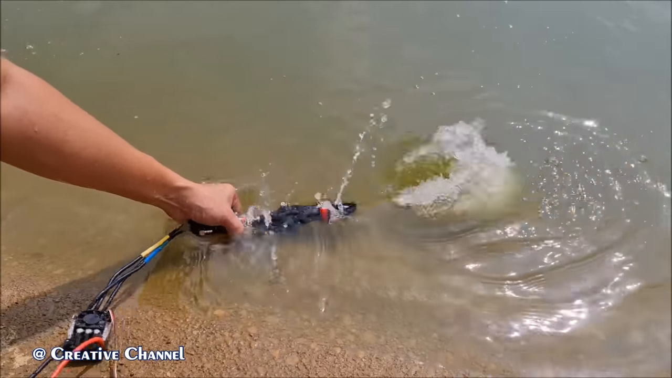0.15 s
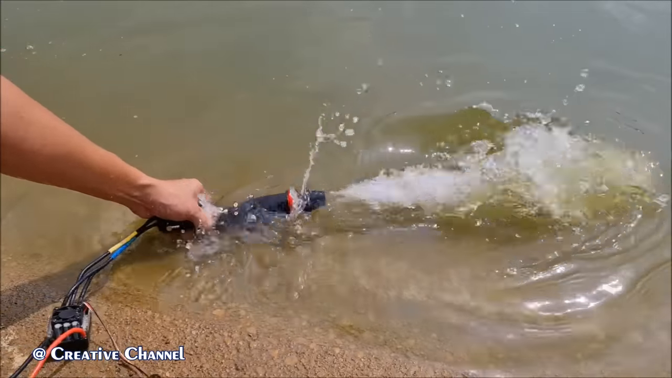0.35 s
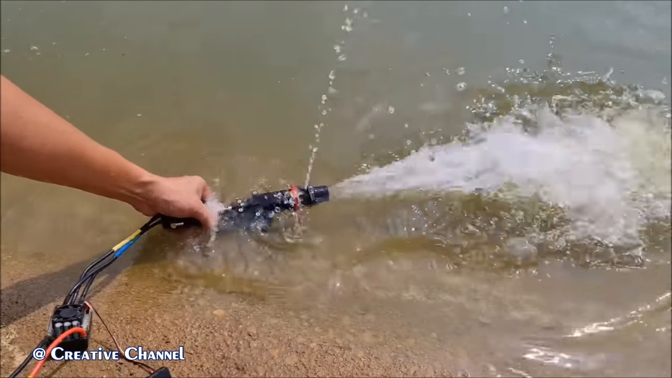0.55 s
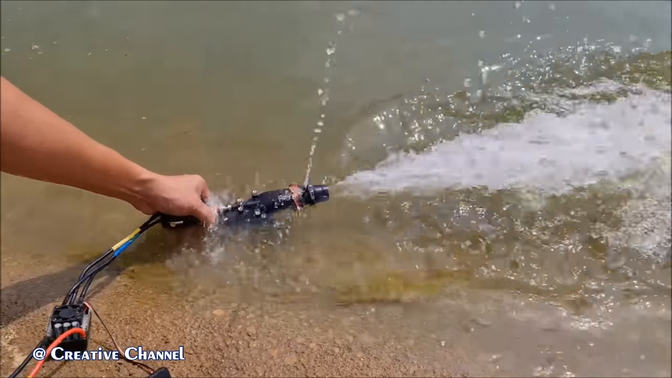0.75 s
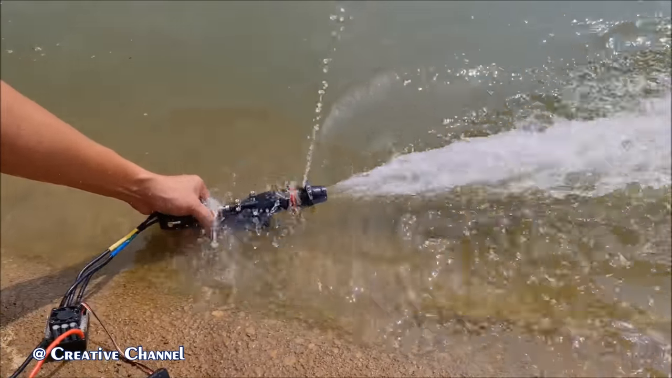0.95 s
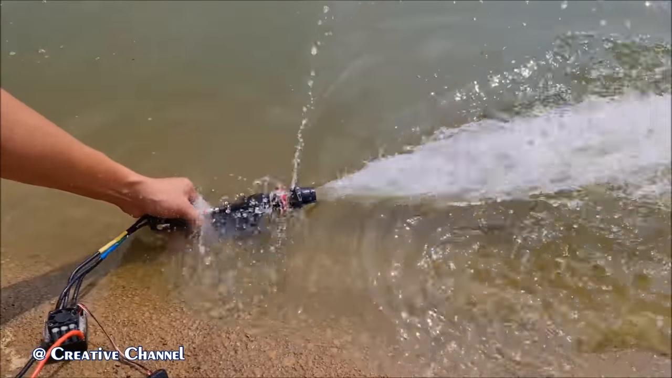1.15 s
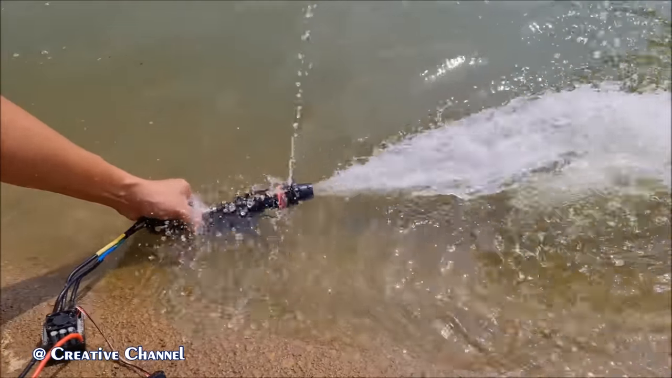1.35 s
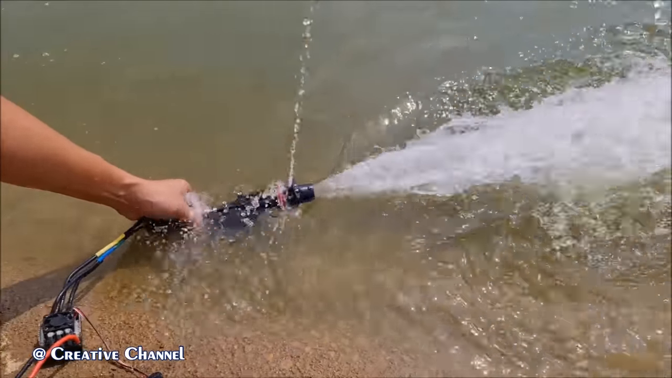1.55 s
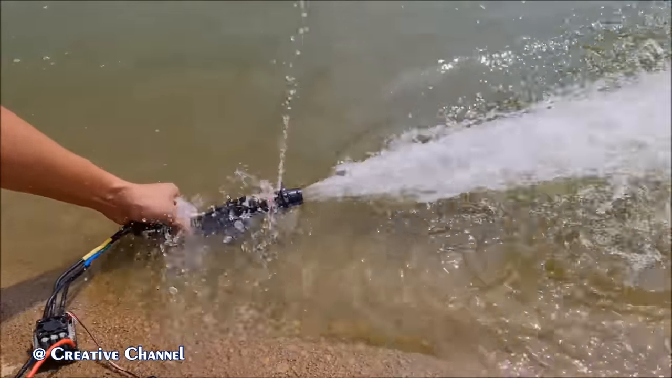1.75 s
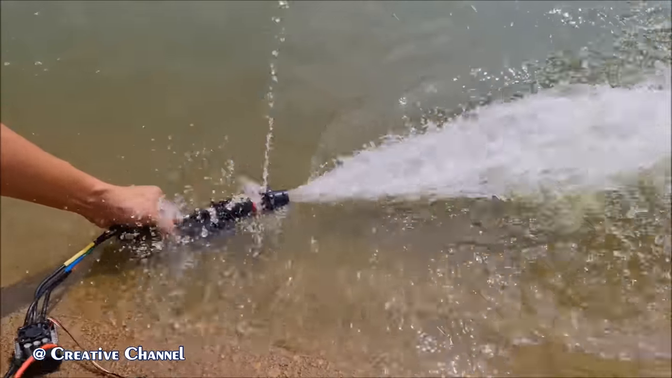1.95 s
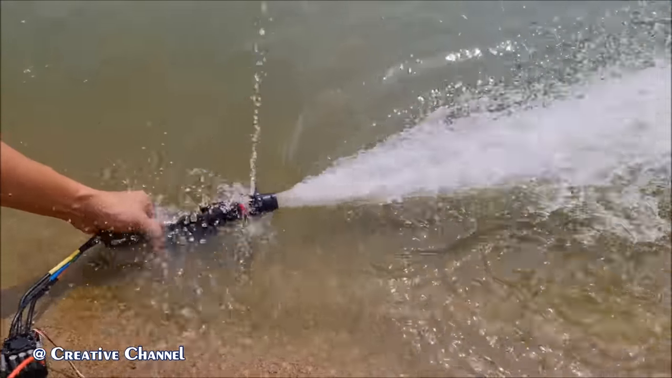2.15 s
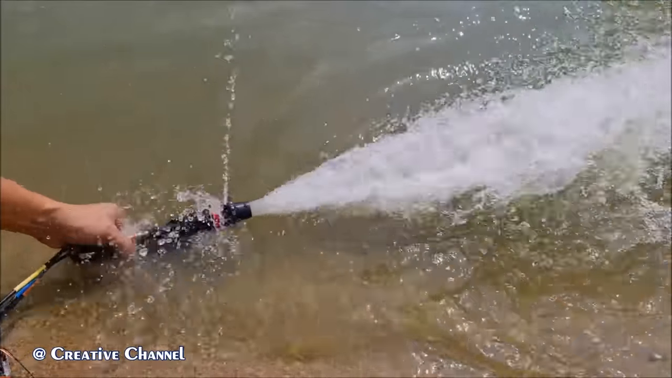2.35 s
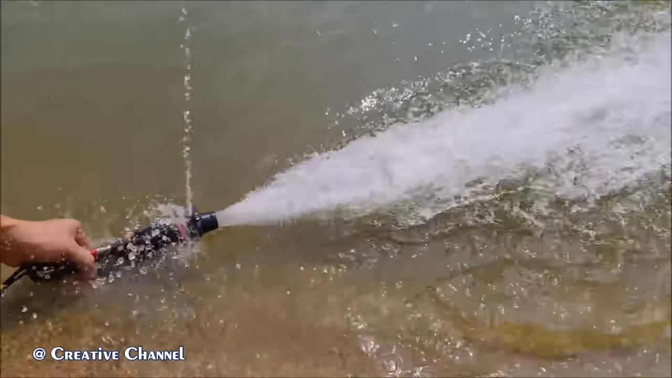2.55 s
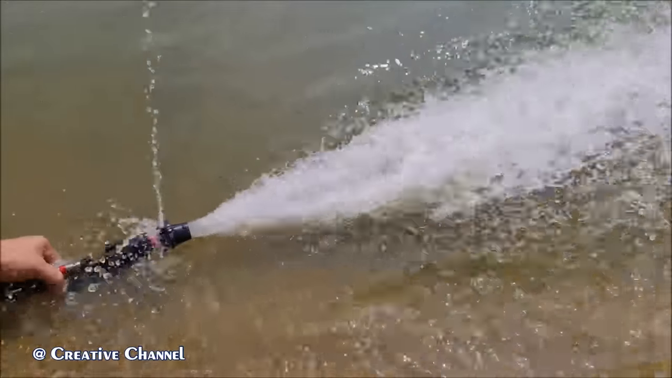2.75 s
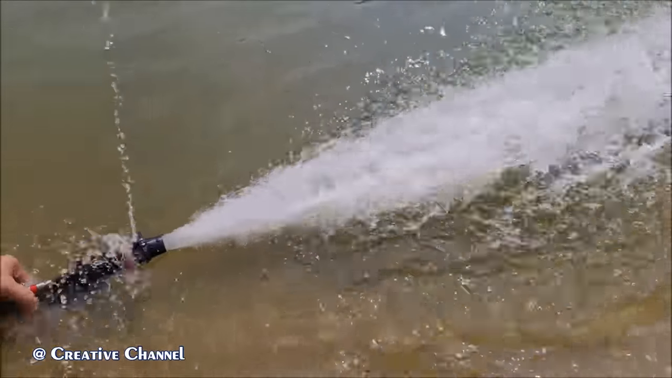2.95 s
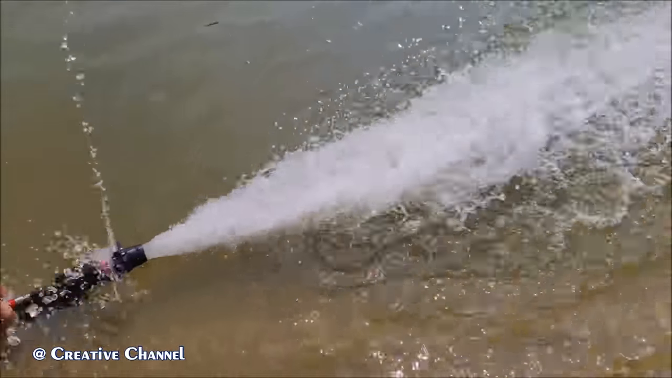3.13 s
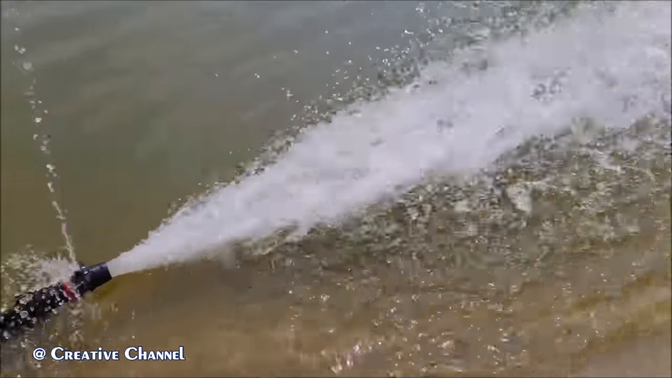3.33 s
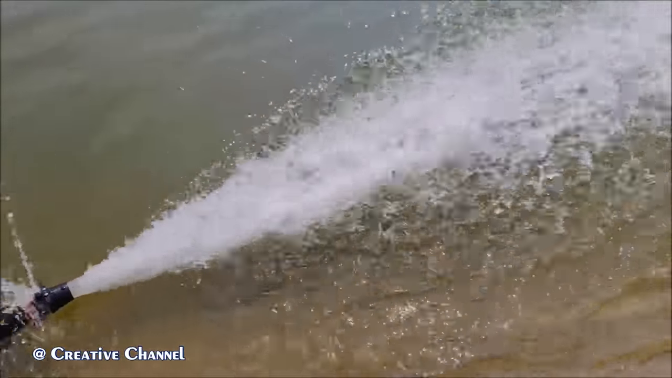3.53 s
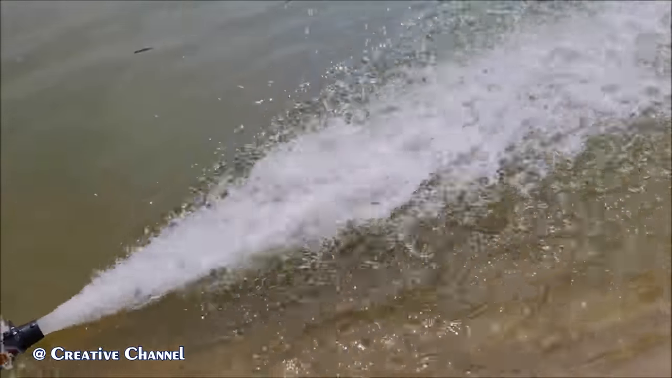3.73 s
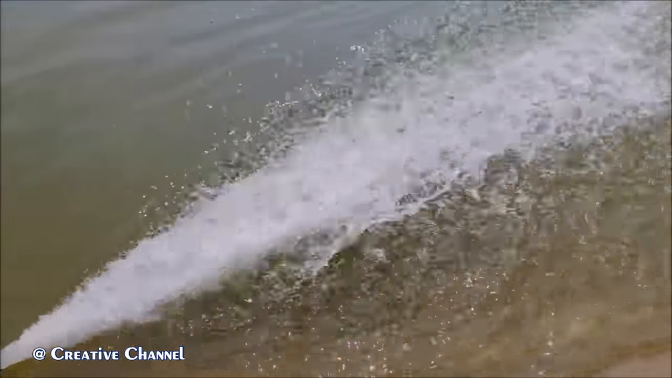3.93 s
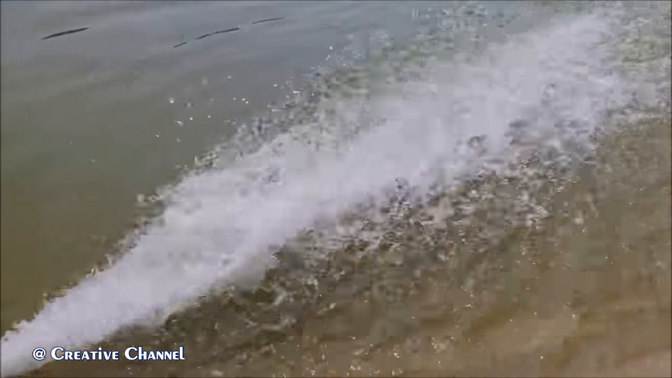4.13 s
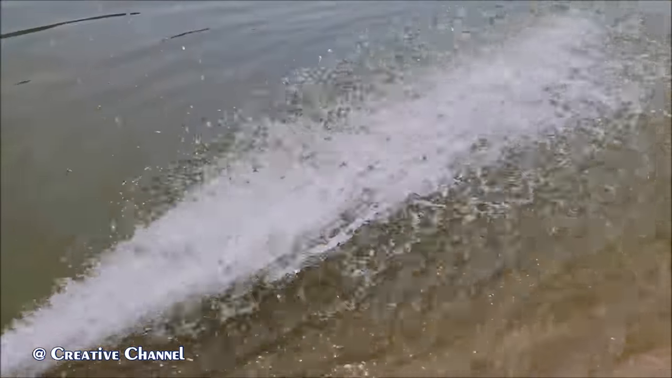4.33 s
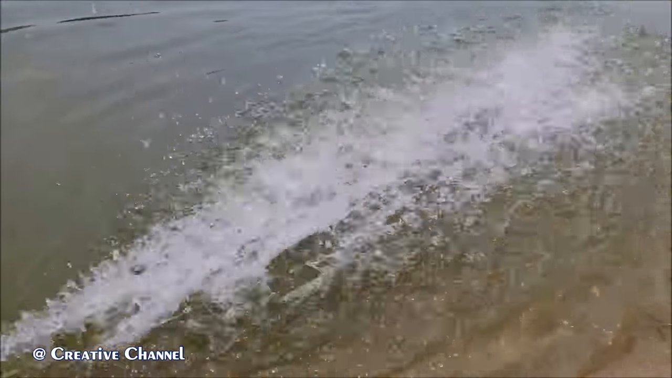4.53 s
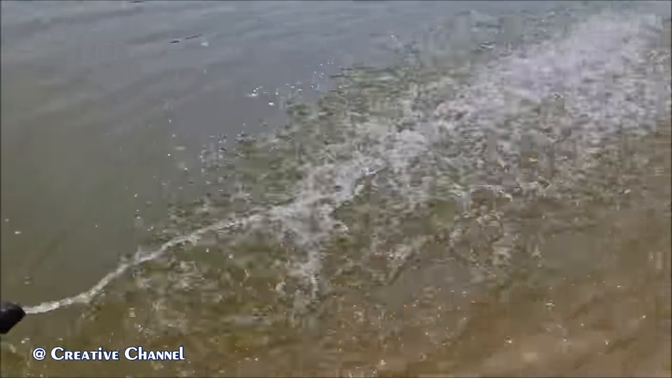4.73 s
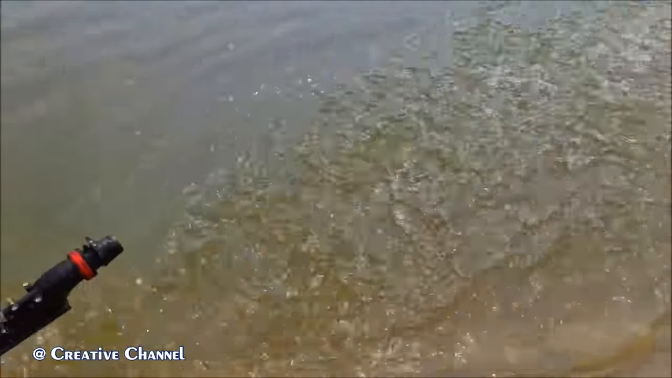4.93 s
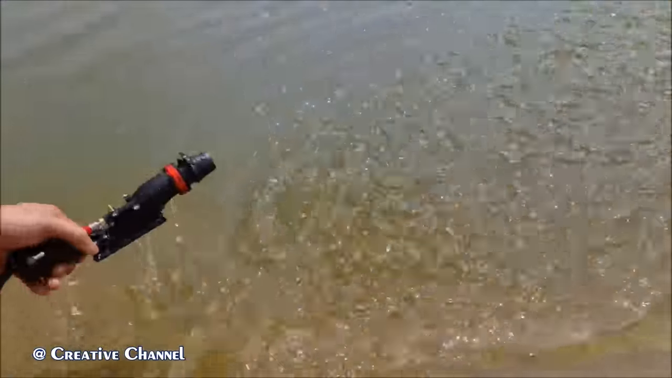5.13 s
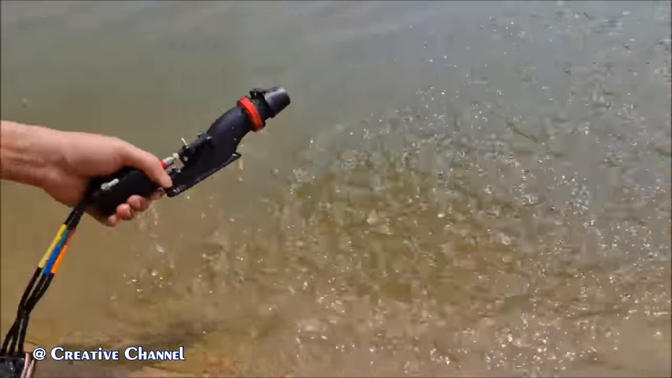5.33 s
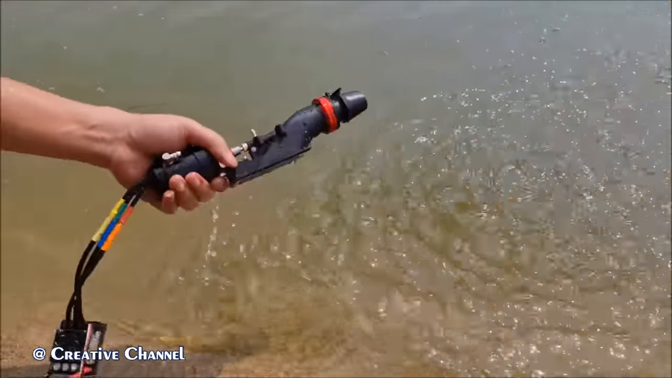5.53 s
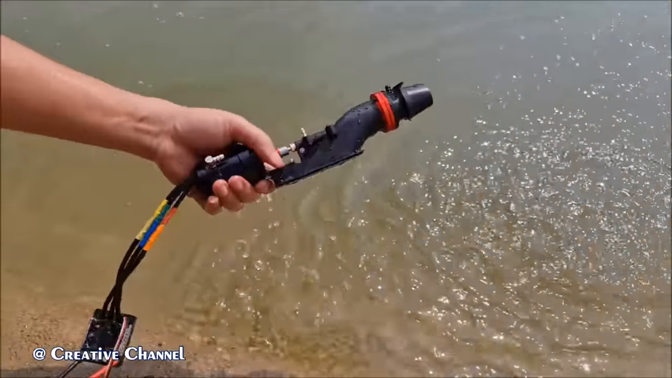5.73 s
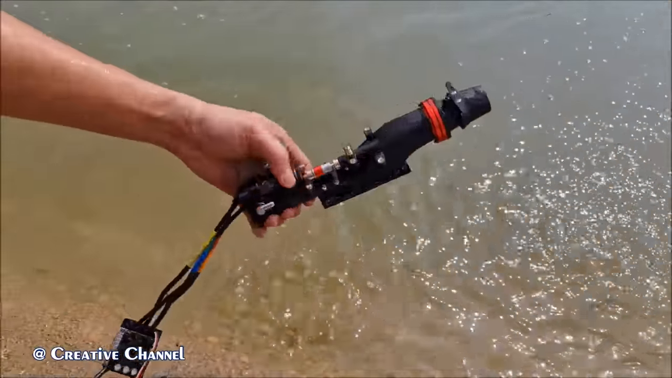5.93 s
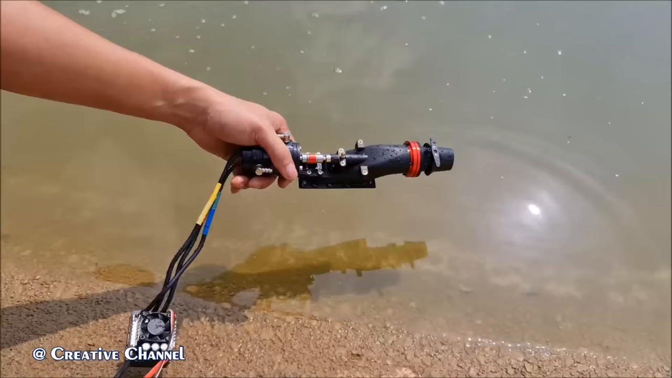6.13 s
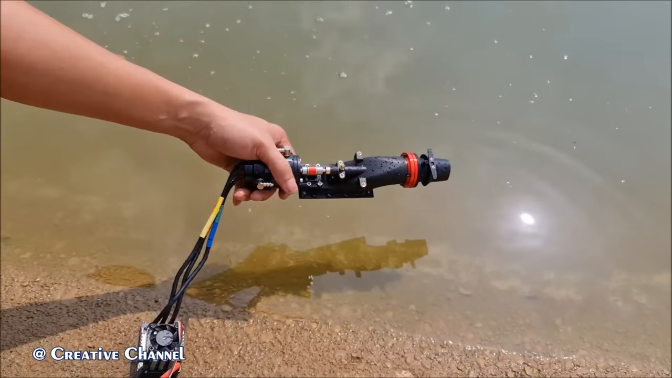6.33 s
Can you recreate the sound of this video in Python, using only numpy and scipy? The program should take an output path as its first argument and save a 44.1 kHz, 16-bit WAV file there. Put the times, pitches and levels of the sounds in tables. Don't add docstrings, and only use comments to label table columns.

```python
import sys
import numpy as np
from scipy import signal
from scipy.io import wavfile
from scipy.ndimage import uniform_filter1d, map_coordinates

SR = 44100
rng = np.random.default_rng(int(sys.argv[2]) if len(sys.argv) > 2 else 0)


def convert_level_to_amplitude(level_db):
    exponent = np.asarray(level_db, float) / 20
    return 10 ** exponent


def dump_mix(stems):
    frames = np.atleast_2d(stems).T
    limited = np.clip(frames, -1, 1)
    pcm = np.round(limited * 32767).astype(np.int16)
    wavfile.write(sys.argv[1], SR, pcm)


N = 285768
HZ = np.fft.rfftfreq(512, 1 / SR)
T = np.arange(N // 128 + 5) * 128 / SR

# (frequency [Hz], left level [dB], right level [dB])
EAR_COLOUR = [(130, -16.5, -16), (384, -21, -24.5), (466, -8.5, -12), (800, -7.5, -5), (1000, -11.5, -22.5),
              (1123, -3, -5), (1970, -1, -8.5), (3000, 0.5, -10), (5060, -9, -12), (6220, -11.5, -8.5),
              (7580, -16, -16), (9600, -15, -22), (12400, -14.5, -11), (16960, -21, -25.5)]
# (frequency [Hz], likeness [0-1])
LIKENESS = [(300, 0.73), (800, 0.85), (1300, 0.52), (2000, 0.58), (3500, 0.17), (6000, 0.037),
            (12000, 0.054)]
# (time [s], lead [samples])
LEFT_LEAD = [(0, 3), (1.2, 0.5), (2.4, 6.8), (3.6, 10.5), (4.4, 14.4), (4.6, 6), (6.48, 13.7)]
# (time [s], left-right level [dB], lift out of the water [0-1])
POSE = [(0, 1.5, 0.12), (.5, 0, 0.16), (1, 0, 0.48), (1.7, 0, 0.57), (2.4, 2.5, 0.7), (3, 2.5, 0.92),
        (3.8, 5, 0.96), (4.4, 4.5, 0.98), (4.55, 0.5, 0.4)]
# (frequency [Hz], width [Hz], level [dB])
RUSH_RIDGES = [(643, 87, -13.5), (40, 124, -11), (1040, 86, -2.5), (1710, 130, 3.5), (2690, 110, 0.5)]
# (time [s], level [dB])
WATER_FLOW = [(0, -48), (.075, -49), (.115, -37), (.19, -36), (.25, -38.5), (.295, -41.5), (.38, -35),
              (.45, -35), (.5, -36.5),
              (.55, -36), (1.02, -33), (1.1, -31), (1.25, -30), (1.35, -31), (1.65, -31), (1.75, -27.5),
                (1.88, -28), (1.97, -28.5), (2.4, -28.5), (2.9, -28), (3, -28), (3.78, -29), (4.039, -28),
                (4.45, -28.5)]
# (time [s], gain [dB], half length [s])
SPITS = [
    (0.318, 12, 0.0084),
    (0.348, 5.5, 0.018),
]
# (time [s], firing rate [Hz], level [dB])
ENGINE = [
    [(0, 21.85, -59), (1.85, 22.78, -60), (3.5, 22.69, -58), (4.85, 22.65, -60)],
    [(4.85, 24, -63), (5.1, 19, -55.5), (5.5, 20, -59), (5.94, 21, -58), (6.15, 19, -60)],
    [(6.15, 25.36, -65), (6.48, 24.6, -63)],
]
# (order [number], level in first, second, third stretch [dB])
ENGINE_ORDERS = [(2, 5.5, -6, 4.5), (3, -16, -7, -7), (4, 5, -1, 8), (5, 4.5, -4, 8.5), (6, -1, -18, -18),
                 (7, -16.5, -36, -21), (8, -13.5, -41, -26)]
# (frequency [Hz], level [dB per Hz])
AIR_COLOUR = [(18, -34), (30, -7), (85, -5), (168, -14), (505, -24), (622, -24.5), (945, -29.5),
              (1720, -24.5), (4780, -29), (5310, -29), (15500, -34)]
# (frequency [Hz], waver [Hz], level [dB])
INSECTS = [(4930, 12, -78), (7900, 25, -99)]
# (time [s], peak level [dB], from [Hz], to [Hz], length [s])
WHISTLES = [(.002, -46, 2050, 2180, 0.03), (0.019, -42, 2140, 2680, 0.034), (0.03, -53, 401, 650, 0.11),
            (0.029, -51, 775, 1040, 0.077), (0, -49, 1510, 1750, 0.016), (4.934, -47, 646, 1480, 0.016),
            (5.173, -48, 800, 2200, 0.014), (5.212, -54, 2210, 3000, .018), (5.257, -48, 1120, 2000, 0.014),
            (5.593, -59, 1070, 1800, 0.026), (.29, -48, 260, 110, .04)]
# (time [s], peak level [dB], pitch [Hz])
SNAPS = [(.0812, -34, 12000), (.1246, -37, 10000), (.1511, -35, 12500), (.166, -38, 12200),
         (.196, -38, 10700), (.3002, -38, 11500), (.3321, -32, 11500), (.344, -32, 11500),
         (4.9758, -43, 12500), (4.9828, -39, 10300), (5.04, -44, 11500), (5.0596, -41, 13000),
         (5.064, -42, 11500), (5.095, -50, 12500), (5.101, -45, 10000), (5.1978, -49, 11600),
         (5.222, -41, 12800), (5.244, -48, 14500), (5.2776, -45, 13200), (5.318, -51, 12000),
         (5.3515, -42, 11200), (5.361, -49, 10200), (5.4083, -56, 11700), (5.635, -60, 11200),
         (5.717, -64, 10300)]
# (time [s], resonance [Hz], level [dB])
AIR_POCKET = [(.095, 1402, -50), (.11, 1240, -39), (.124, 830, -36), (.14, 600, -44), (.16, 470, -45),
              (.183, 440, -39), (.21, 400, -47), (.238, 428, -39.5), (.262, 435, -47), (.3, 530, -41),
              (.32, 766, -29), (.335, 1000, -37), (.35, 1200, -59)]
# (from [s], to [s], frequency [Hz], width [Hz], level [dB])
FROTH_STREAKS = [(.15, 0.226, 1665, 89.5, -44), (.3, .66, 1730, 60, -48.5), (0.38, 0.487, 1220, 90, -41),
                 (0.292, 0.99, 2730, 150, -45), (.55, .9, 2100, 100, -47.5), (1.052, 1.45, 2765, 120, -43),
                 (1.094, 1.3, 1220, 70, -46), (2.6, 2.9, 2840, 250, -34.5), (4.054, 4.299, 3210, 200, -47),
                 (4.326, 4.386, 3150, 250, -33.5), (4.409, 4.47, 3170, 200, -35),
                 (4.282, 4.33, 3500, 120, -40)]
# (time [s], speed [Hz])
SHAFT_SPEED = [(1.04, 354), (1.12, 369), (1.25, 368), (1.4, 346), (1.55, 332.4), (1.63, 344.5), (1.68, 387),
               (1.77, 429.4), (1.83, 436.8), (2.0, 421.7), (2.4, 417.6), (2.85, 417), (3.0, 419.9),
               (3.3, 419.9), (3.8, 418), (3.98, 435), (4.39, 439), (4.47, 408)]
ORDERS_DB = [-53.5, -45.5, -46, -32.5, -40.5, -48, -57.5, -47.5]
# (from [s], to [s], gain [dB])
ORDER_SWELLS = [
    [(1.78, 2.25, 11), (3.35, 4.0, 3.5), (4.1, 4.42, 9.5)],
    [(1.42, 1.72, 8), (2.4, 3.3, 8.5), (3.3, 3.8, 4)],
    [(1.74, 1.95, 7.5), (2.45, 3.2, 4)],
    [(1.08, 1.29, -0.5), (1.3, 1.47, -17), (1.6, 1.68, -6), (1.75, 1.9, 4.5), (1.92, 1.99, -15.5),
     (1.99, 2.1, 3), (2.1, 2.22, -11), (2.21, 2.32, 10), (2.31, 2.37, -10), (2.38, 2.6, 1.5),
     (2.6, 2.95, 3), (2.95, 3.28, -1), (3.28, 3.37, -0.5), (3.37, 3.6, 2.5), (3.6, 3.9, 4), (3.9, 3.97, -8),
     (3.97, 4.08, 3), (4.08, 4.18, -12), (4.4, 4.5, 1.5)],
    [(1.7, 1.9, 2), (2.06, 2.12, 5), (2.5, 2.78, 8), (2.62, 2.66, 4), (3.2, 3.38, 3.5), (3.38, 3.76, 9),
     (3.84, 4.08, 10), (4.08, 4.4, 5), (4.42, 4.5, 7)],
    [(3.52, 3.9, 8.5), (4.0, 4.17, 13.5), (4.2, 4.3, 13), (4.3, 4.42, 9)],
    [(2.22, 2.5, 8), (2.72, 2.82, 10), (3.55, 3.72, 13), (3.95, 4.4, 14)],
    [(1.86, 1.98, 12.5), (2.17, 2.4, 21), (2.4, 2.78, 19), (2.81, 2.95, 22), (2.98, 3.7, 8)],
]
# (time [s], peak level [dB], pitch [Hz], t60 [s])
TRAPPED_BUBBLES = [(4.968, -41, 950, 0.046), (5.045, -44, 784, 0.05), (5.057, -48, 1270, .059),
                   (5.084, -51, 841, 0.052), (5.122, -39.5, 813, 0.051), (5.195, -50, 890, 0.053),
                   (5.238, -39, 1426, 0.02), (5.303, -49, 1040, 0.056), (5.331, -46, 880, 0.074),
                   (5.338, -50, 885, 0.1), (5.534, -44, 1116, 0.077), (5.857, -48, 1710, 0.08),
                   (4.763, -36, 1326, 0.033), (4.848, -46, 860, .05), (4.874, -37, 1560, .04),
                   (5.193, -50, 1230, .05), (5.334, -48, 1690, 0.048), (4.862, -46, 1520, .04),
                   (4.906, -42, 1880, .03), (4.944, -38, 1250, .04), (4.952, -48, 2350, .03),
                   (4.968, -47, 1600, .04), (5.028, -58, 1400, .04), (5.088, -52, 1650, .03),
                   (5.108, -62, 1290, 0.027), (5.145, -62, 1280, .03), (5.228, -55, 1500, 0.032),
                   (5.282, -56, 1330, .03), (5.318, -54, 1140, .04), (5.408, -70, 1120, 0.043),
                   (5.494, -63, 1010, 0.022)]
# (time [s], peak level [dB], pitch [Hz], left-right level [dB])
SPLATS = [(4.764, -32, 3700, -2), (4.8825, -35, 2490, 12.5), (4.921, -33, 8400, 4), (4.973, -33, 3870, 3),
          (5.0, -39, 9000, 1), (5.0187, -49, 3470, 9), (5.033, -34, 6040, 3), (5.067, -36, 6070, 8),
          (5.133, -41, 10100, 1), (5.1517, -32.5, 6660, -8), (5.2032, -40, 5250, 0.5),
          (5.212, -42, 2370, 13), (5.23, -25, 12800, -7), (5.2562, -39, 6950, -1.0),
          (5.2776, -40, 4120, 1.0), (5.3026, -46, 5290, 7), (5.335, -37, 5400, 7), (5.4083, -57, 4840, 3),
          (5.4353, -54, 2425, 10), (5.4522, -49, 2360, 9), (5.466, -40.5, 4800, 2), (5.495, -48, 2250, 14),
          (5.5208, -47, 2530, 11), (5.535, -42, 2061, 9), (5.5959, -50, 6220, 4), (5.6952, -46.5, 2520, 10),
          (5.808, -58, 3170, 2), (5.8713, -48, 2930, 8), (4.906, -44, 2500, 5), (4.941, -43, 3100, 6),
          (4.986, -44, 4400, 3), (5.04, -42, 4000, 3), (5.064, -40, 3800, 7), (5.16, -42, 3300, 4),
          (5.222, -44, 3000, 5), (5.288, -45, 4000, 2), (5.347, -51, 5600, 4)]
# (time [s], peak level [dB], pitch [Hz], left-right
# level [dB])
KNOCKS = [(6.048, -44, 3000, 18), (6.0577, -44, 2840, 4.7), (6.0747, -49, 3900, 12),
          (6.0816, -50, 2880, 7.5), (6.095, -54, 2600, 8), (6.112, -47, 1870, 5.4), (6.118, -56, 2600, 6),
          (6.4188, -45, 2620, 10)]
# (time [s], peak level [dB], pitch [Hz], t60 [s])
CASING_RINGS = [(6.033, -63, 3050, 0.024), (6.048, -43, 3050, .025), (6.049, -45, 2116, 0.019),
                (6.058, -45, 2730, .015), (6.075, -40.5, 2200, 0.019), (6.076, -47, 3150, .025),
                (6.005, -63, 1750, .03), (6.306, -52, 3500, 0.0099), (6.3235, -55, 3400, .012),
                (6.4193, -41, 2540, 0.037), (6.419, -49, 2900, .04)]
# (time [s], peak level [dB], pitch [Hz], t60 [s], pitch rise [per t60])
LAST_PLOP = [
    (6.112, -40.5, 960, .11, .42),
    (6.112, -43, 1300, .016, 0),
    (6.118, -39.5, 1110, .12, .36),
    (6.118, -46, 1500, .012, 0),
]
# (time [s], level [dB])
RUBS = [
    [(6.15, -74), (6.195, -62), (6.222, -75)],
    [(6.31, -65), (6.335, -61), (6.362, -59)],
    [(6.4, -54), (6.425, -51.5), (6.46, -69)],
]
# (time [s], peak level [dB], sharp edge [dB])
TAPS = [(6.1734, -66, -20), (6.193, -61, -30), (6.306, -64, -19), (6.323, -59.5, -22), (6.3485, -57, -30),
        (6.4015, -54, -13), (6.4187, -44.5, -16), (6.4514, -57, -2)]
# (frequency [Hz], width [Hz], level [dB])
CASING = [(1356, 110, -5), (2500, 81, -2), (2820, 61, -16), (3780, 280, -16), (4240, 170, -13),
          (2400, 1320, -13.5), (5570, 910, -40)]

STOP_S, LANDED_S, SCENE_CHANGE_S = 4.408, 4.806, 6.152
DRIP_PAN_DB = 10
SIDES = np.array([[0.5], [-0.5]])


def evened(x):
    return x / np.sqrt(np.mean(abs(x) ** 2) + 1e-20)


def read(points, hz):
    f, *values = np.transpose(points)
    return np.array([np.interp(np.log(hz + 1), np.log(f + 1), v) for v in values])


def curves(rows, t):
    s, *columns = np.transpose(rows)
    return [np.interp(t, s, c) for c in columns]


def add(mix, s, sound):
    part = mix[:, round(s * SR):][:, :sound.shape[1]]
    part += sound[:, :part.shape[1]]


def bump(t, s, db, half_s):
    return db * np.clip(1 - abs(t - s) / half_s, 0, 1)


def ramp(t, s, length_s):
    return np.clip((t - s) / abs(length_s), 0, 1)


def wander(rate_hz):
    size = max(int(SR / rate_hz), 2)
    smooth = uniform_filter1d(rng.standard_normal(N), size)
    return evened(uniform_filter1d(smooth, size))


def resonate(x, hz, width):
    turn = np.exp(2j * np.pi * np.cumsum(hz * np.ones(len(x))) / SR)
    r = np.exp(-np.pi * width / SR)
    return 2 * (turn * signal.lfilter([1 - r], [1, -r], x / turn)).real


def delayed(x):
    n = np.arange(N)
    return map_coordinates(x, [n - curves(LEFT_LEAD, n / SR)[0]], order=3)


def place(x, pan_db):
    return np.array([x * convert_level_to_amplitude(pan_db / 2), delayed(x) * convert_level_to_amplitude(-pan_db / 2)])


def lag(pair):
    return np.array([pair[0], delayed(pair[1])])


def noise(field_db, drive, patchy_db):
    left, other = signal.stft(drive, nperseg=512, noverlap=384)[2][:, :, :len(T)]
    patches = rng.standard_normal((len(T), len(HZ))).T
    patches = uniform_filter1d(patches, size=7, axis=0)
    patches = evened(uniform_filter1d(patches, size=20, axis=1))
    same = np.clip(read(LIKENESS, HZ)[0], 0, 1)[:, None]
    late = np.exp(-2j * np.pi * HZ[:, None] * curves(LEFT_LEAD, T)[0] / SR)
    z = np.array([left, same * late * left + np.sqrt(1 - same ** 2) * other])
    return signal.istft(z * convert_level_to_amplitude(field_db + patchy_db * patches), nperseg=512, noverlap=384)[1][:, :N]


def bubble(t, db, hz, t60, pan, rise, onset_cycles=1.2):
    phase = 2 * np.pi * hz * (t + rise * t ** 2 / (2 * abs(t60)))
    ring = np.sin(phase) * (1 - np.exp(-t * hz / onset_cycles))
    return convert_level_to_amplitude(db - 60 * t / abs(t60) + pan * SIDES) * ring


def water_level(raining, landed, spit):
    level = curves(WATER_FLOW, T)[0] + spit
    rain_db = -32.5 - 30.8 * (T - STOP_S) + bump(T, 4.8, 3.5, 0.02)
    level += raining * (rain_db - level)
    trickle_db = -52 - 23.4 * (T - LANDED_S)
    level += landed * (trickle_db - level)
    return level - 40 * ramp(T, 5.37, 0.078)


def water_colour(lift, raining, landed):
    # low churn, froth near 1.5 kHz, deep gurgle, fizz [dB]
    sunk = np.array([[7], [5], [5], [-2.5]])
    lifted = np.array([[-0.96], [-1.8], [-1.2], [0.39]])
    rain = np.array([[1.5], [3.6], [0.5], [1]])
    thinned = np.array([[-7.5], [3], [5], [3]])
    trickle = np.array([[-6], [-6.5], [0], [4.5]])
    colour = sunk + lift * (lifted - sunk)
    thinning = ramp(T, STOP_S, LANDED_S - STOP_S)
    colour += raining * (rain + thinning * (thinned - rain) - colour)
    return colour + landed * (trickle - colour)


def rush(drops_per_s=3000, spread_db=3, grain=0.35, flutter_db=-0.28, gusts_db=4.0):
    pan, lift = curves(POSE, T)
    raining, landed = ramp(T, STOP_S, 0.093), ramp(T, LANDED_S, 0.016)
    spit = sum(bump(T, *row) for row in SPITS)
    level = water_level(raining, landed, spit)
    low, froth, deep, fizz = water_colour(lift, raining, landed)

    shape = (2, len(T) * 128)
    drops = (rng.random(shape) < drops_per_s / SR) * rng.choice([-1, 1], shape)
    drops = drops * convert_level_to_amplitude(spread_db * np.minimum(rng.exponential(1, shape), 4))
    drive = rng.standard_normal(shape) + grain * evened(drops)

    ears = read(EAR_COLOUR, HZ)
    ears = ears + sum(db / (1 + (2 * (HZ - hz) / width) ** 2) for hz, width, db in RUSH_RIDGES)
    band = (HZ > 1000) & (HZ < 6000)
    ears = ears - 10 * np.log10(np.sum(convert_level_to_amplitude(2 * ears[:, band])) / (2 * len(HZ)))

    hz = HZ[:, None] + 1
    lows = np.clip(np.log2(1150 / hz) * 3, 0, 1)
    highs = np.clip(np.log2(hz / 4500) * 2.0, 0, 1)
    deeps = np.clip(np.log2(450 / hz) * 3.2, 0, 1)
    top = np.clip(np.log2(hz / 9000) * 2, 0, 1)
    foam = landed * bump(T, 4.84, 9.3, 0.21)
    dry_fizz = bump(T, 0.024, 8.9, 0.017)
    tilt = lows * (low + 0.22 * spit)
    tilt = tilt + highs * (fizz - 0.7 * spit + dry_fizz - 1.1 * foam)
    tilt += (froth + foam) / (1 + ((hz - 1450) / 380) ** 2) + deep * deeps
    tilt += -3.5 * ramp(T, 2.77, 0.5) * (1 - raining) * top
    sides = (1 - lows) * (1 - highs) * (pan - 4.5) * SIDES[:, :, None]
    frame_start = np.minimum((T * SR).astype(int), N - 1)
    flutter = (flutter_db + gusts_db * landed) * wander(29)[frame_start]
    return noise(ears[:, :, None] + tilt + sides + level + flutter + 2.0, drive, patchy_db=1.0)


def engine(uneven_db=1):
    out = np.zeros((2, N))
    for stretch, rows in enumerate(ENGINE, 1):
        t = np.arange(rows[0][0], rows[-1][0], 1 / SR)
        hz, db = curves(rows, t)
        turns = np.cumsum(hz * (1 + 0.009 * wander(6.0)[:len(t)])) / SR
        beat = np.zeros(len(t))
        for order in ENGINE_ORDERS:
            order_db = order[stretch] + uneven_db * wander(4.5)[:len(t)]
            beat += convert_level_to_amplitude(order_db) * np.cos(2 * np.pi * order[0] * turns)
        thud = convert_level_to_amplitude(db) * evened(beat) * signal.windows.tukey(len(t), 0.04)
        add(out, t[0], np.tile(thud, (2, 1)))
    return out


def air():
    before = T < SCENE_CHANGE_S
    level = np.where(before, -68, -70)
    mist = -59.5 - 16.5 * np.maximum(T - 4.6, 0)
    treble = np.where(before, mist, -91)
    colour = read(AIR_COLOUR, HZ)
    band = (HZ > 250) & (HZ < 4000)
    colour = colour - 10 * np.log10(np.sum(convert_level_to_amplitude(2 * colour[:, band])) / len(HZ))
    highs = np.clip(np.log2((HZ + 1) / 4000), 0, 1)[:, None]
    mids = np.clip(HZ / 2500, 0, 1)[:, None] * (1 - highs)
    field = colour[:, :, None] + level + highs * (treble - level + 5.5)
    field = field + bump(T, 6.26, -10, 0.076) * mids
    return noise(field, rng.standard_normal((2, len(T) * 128)), patchy_db=0.5)


def insects():
    out = np.zeros((2, N))
    throb_db = 3 * np.sin(2 * np.pi * 33 * np.arange(N) / SR)
    for hz, width, db in INSECTS:
        song = np.sin(2 * np.pi * np.cumsum(hz + width * wander(90)) / SR)
        out += convert_level_to_amplitude(db + 2.5 * np.array([wander(90), wander(90)]) + throb_db) * song
    return out


def whistles():
    out, t = np.zeros((2, N)), np.arange(5000) / SR
    for s, db, from_hz, to_hz, length in WHISTLES:
        u = t[t < length]
        glide = signal.chirp(u, from_hz, length, to_hz, "logarithmic")
        glide = glide * signal.windows.tukey(len(u), 0.7)
        add(out, s, convert_level_to_amplitude(db + DRIP_PAN_DB * SIDES) * glide)
    return out


def snaps(t60=0.0055, spread=0.2):
    out, t = np.zeros((2, N)), np.arange(800) / SR
    jolts = rng.standard_normal((len(SNAPS), 2, len(t)))
    for (s, db, hz), jolt in zip(SNAPS, jolts):
        tone = np.sin(2 * np.pi * hz * t)
        ring = np.array([tone + 0.6 * evened(resonate(j, hz, spread * hz)) for j in jolt])
        add(out, s, convert_level_to_amplitude(db + 4.5 - 60 * t / t60) * (1 - np.exp(-t / 0.0002)) * ring)
    return out


def gulp(width_hz=110, burst_s=0.305, burst_hz=300):
    t = np.arange(N) / SR
    hz, db = curves(AIR_POCKET, t)
    rough = evened(resonate(resonate(rng.standard_normal(N), hz, width_hz), hz, 2 * width_hz))
    tone = np.sqrt(2) * np.sin(2 * np.pi * np.cumsum(hz) / SR)
    burst = evened(resonate(rng.standard_normal(N), hz, burst_hz))
    ring = evened(np.where(t < burst_s, rough / 2 + tone, burst))
    present = (t > AIR_POCKET[0][0]) * (t < AIR_POCKET[-1][0])
    return place(ring * convert_level_to_amplitude(db) * present, 3.5)


def streaks(edge_s=0.021, flicker_db=3):
    t, out = np.arange(N) / SR, np.zeros(N)
    for s, end, hz, width, db in FROTH_STREAKS:
        band = evened(resonate(resonate(rng.standard_normal(N), hz, width), hz, 2 * width))
        present = ramp(t, s, edge_s) - ramp(t, end - edge_s, edge_s)
        out += convert_level_to_amplitude(db + flicker_db * wander(49)) * band * present
    return place(out, 9.4)


def motor(wobble=(0.007, 0.002), flicker_db=(3, 2.3), halo_db=(-4, -8), cruise_hz=424.7,
          speed_db_per_octave=22, swell_s=0.05):
    t = np.arange(N) / SR
    hz = curves(SHAFT_SPEED, t)[0]
    starting = np.clip((t - SHAFT_SPEED[0][0]) / 0.06, 0, 1)
    stopping = np.clip((SHAFT_SPEED[-1][0] + 0.0055 - t) / 0.013, 0, 1)
    settled = ramp(t, 2.05, 0.15)
    wobble, flicker_db, halo_db = [a + settled * (b - a) for a, b in (wobble, flicker_db, halo_db)]
    turns = np.cumsum(hz * (1 + wobble * wander(67.2))) / SR
    out = np.zeros((2, N))
    for k, (db, swells) in enumerate(zip(ORDERS_DB, ORDER_SWELLS), 1):
        db = db + speed_db_per_octave * np.log2(hz / cruise_hz)
        for s, end, gain_db in swells:
            db += gain_db * (ramp(t, s - swell_s / 2, swell_s) - ramp(t, end - swell_s / 2, swell_s))
        tone = np.sqrt(2) * np.sin(2 * np.pi * (k * turns + rng.random()))
        tone = tone * convert_level_to_amplitude(db + flicker_db * wander(49))
        halo = resonate(resonate(rng.standard_normal(N), k * hz, 30 * k), k * hz, 60 * k)
        tone += convert_level_to_amplitude(db + halo_db) * evened(halo)
        left_db, right_db = read(EAR_COLOUR, k * 437.0)
        pan_db = left_db - right_db + curves(POSE, t)[0] - 4.5
        out += place(convert_level_to_amplitude(-1.7) * tone * starting * stopping, pan_db)
    return out


def patter(count=480, start_s=4.48, end_s=5.45, first_db=-37, last_db=-63):
    out, t = np.zeros((2, N)), np.arange(1500) / SR
    for when, size, strength, side, rise in rng.random((count, 5)):
        when = when ** 1.2
        hz = 1000 * 8 ** (size ** 1.72)
        db = first_db + (last_db - first_db) * when - 12 * strength
        drop = bubble(t, db, hz, 30 / hz, 12 * side - 4, 1.4 * rise)
        burst = convert_level_to_amplitude(db - 23 - 60 * t / 0.012) * (rise < 0.25) * rng.standard_normal((2, len(t)))
        add(out, start_s + when * (end_s - start_s), drop + burst)
    return out


def trapped_bubbles():
    out, t = np.zeros((2, N)), np.arange(5000) / SR
    for s, *ring in TRAPPED_BUBBLES:
        add(out, s, bubble(t, *ring, DRIP_PAN_DB, 0.11))
    for s, *ring, rise in LAST_PLOP:
        add(out, s, bubble(t[t < SCENE_CHANGE_S - s], *ring, DRIP_PAN_DB, rise, 0.6))
    return out


def splats_and_knocks():
    out, t = np.zeros((2, N)), np.arange(5000) / SR
    hits = SPLATS + KNOCKS
    jolts = rng.standard_normal((len(hits), 3, len(t)))
    for (s, db, hz, pan), jolt in zip(hits, jolts):
        edge_db = -14.0 + 1.8 * np.sqrt(max(-db - 16, 0)) + 6 * (hz > 4500)
        edge_db -= 22 * (s > KNOCKS[0][0] - 0.01)
        ring = evened(resonate(jolt[0], hz, 0.15 * hz)) * (1 - np.exp(-t / 0.00058))
        ring = convert_level_to_amplitude(-60 * t / (0.01 + 18 / hz)) * ring
        tick = np.diff(jolt[1:], prepend=0) * (1 - np.exp(-t / 0.001))
        tick = convert_level_to_amplitude(edge_db - 2.5 - 60 * t / 0.008) * tick
        add(out, s, 0.83 * convert_level_to_amplitude(db + pan * SIDES) * (ring + tick))
    return out


def casing_rings():
    out, t = np.zeros((2, N)), np.arange(5000) / SR
    for s, *ring in CASING_RINGS:
        add(out, s, bubble(t, *ring, DRIP_PAN_DB + 6.5, 0, 0.54))
    return out


def handling(pan_db=11, grit_db=4):
    t, push, edge = np.arange(N) / SR, np.zeros((1, N)), np.zeros((1, N))
    grit = rng.standard_normal(N) * convert_level_to_amplitude(grit_db * wander(200))
    for rows in RUBS:
        touching = (t > rows[0][0]) * (t < rows[-1][0])
        push += convert_level_to_amplitude(curves(rows, t)[0] + 9.5) * touching * grit
    cracks = rng.standard_normal((len(TAPS), 400))
    for (s, db, edge_db), crack in zip(TAPS, cracks):
        thump = evened(resonate(crack, 1800, 2100)) * np.hanning(400) ** 8
        add(push, s, convert_level_to_amplitude(db + 13) * thump[None, 130:])
        add(edge, s, convert_level_to_amplitude(db + edge_db - 60 * t[:400] / 0.011) * np.diff(crack, prepend=0)[None])
    out = edge[0]
    for hz, width, db in CASING:
        out = out + convert_level_to_amplitude(db) * resonate(resonate(push[0], hz, width), hz, 6 * width)
    return place(out, pan_db)


def scene():
    lakeside = engine() + air() + insects()
    jet = rush() + gulp() + streaks() + motor()
    drips = whistles() + trapped_bubbles() + splats_and_knocks() + casing_rings()
    return lakeside + jet + lag(drips) + snaps() + patter() + handling()


def roll_off(x):
    return signal.sosfilt(signal.butter(12, 16370, fs=SR, output="sos"), x)


def record(dry):
    rumble_cut = signal.butter(2, 36, "high", fs=SR, output="sos")
    firm = signal.sosfilt(rumble_cut, dry)
    band_limit = signal.firwin(1023, 15850, window=("kaiser", 10), fs=SR)
    limited = signal.oaconvolve(firm, band_limit[None], "same")
    return roll_off(limited)


dry = scene()
out = record(dry)
dump_mix(out)
```